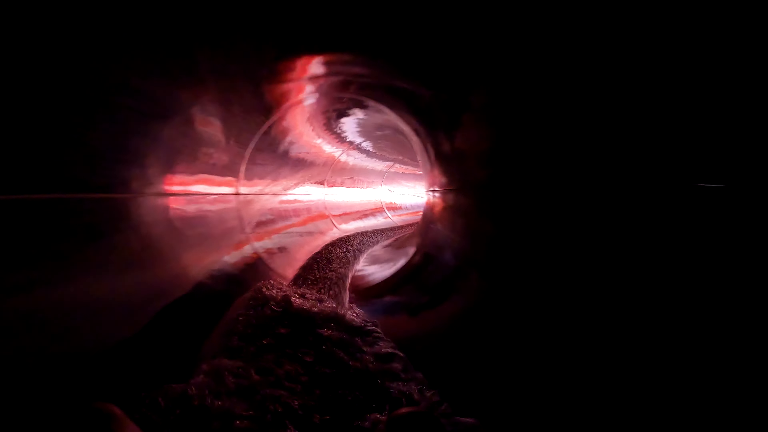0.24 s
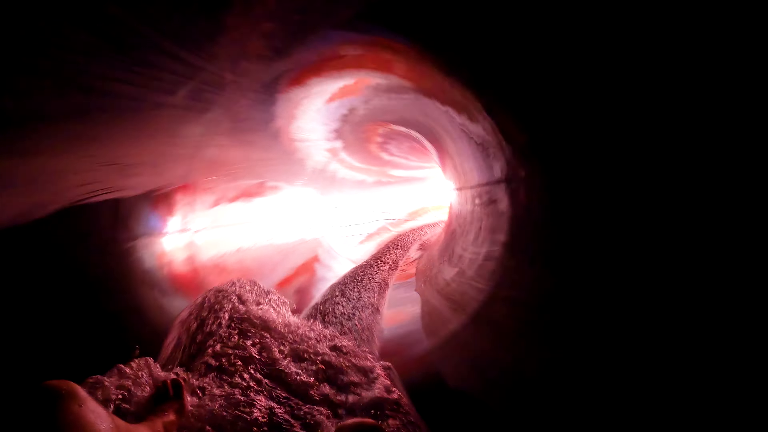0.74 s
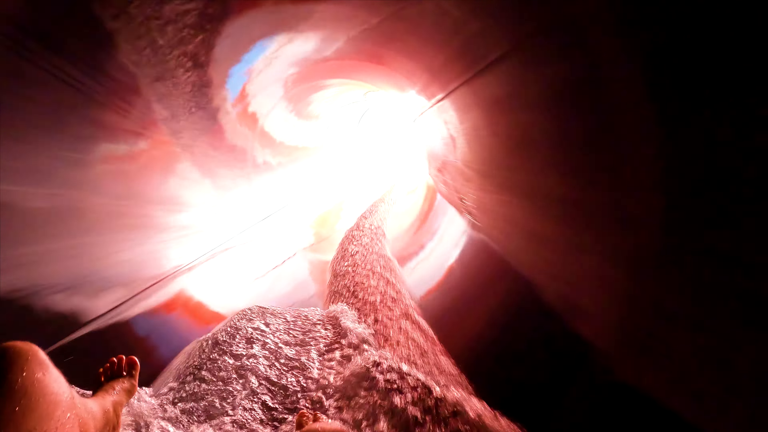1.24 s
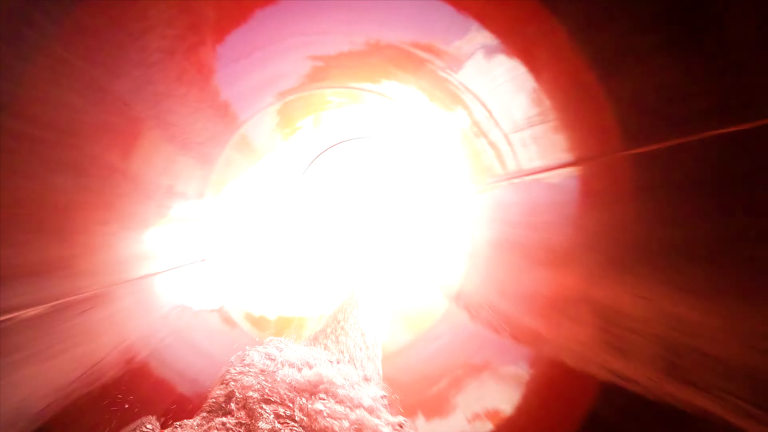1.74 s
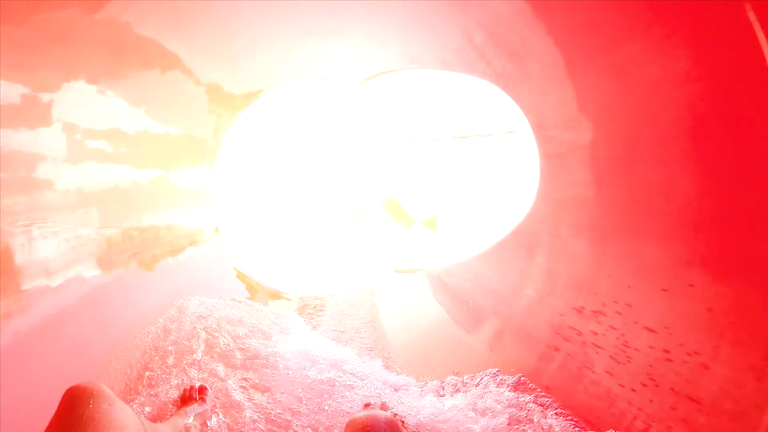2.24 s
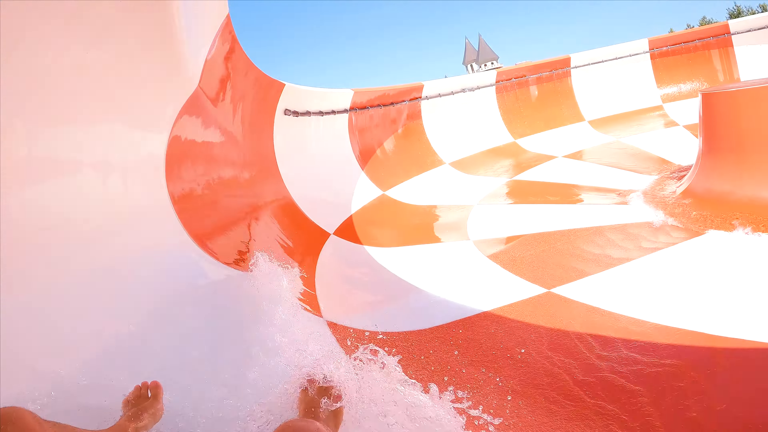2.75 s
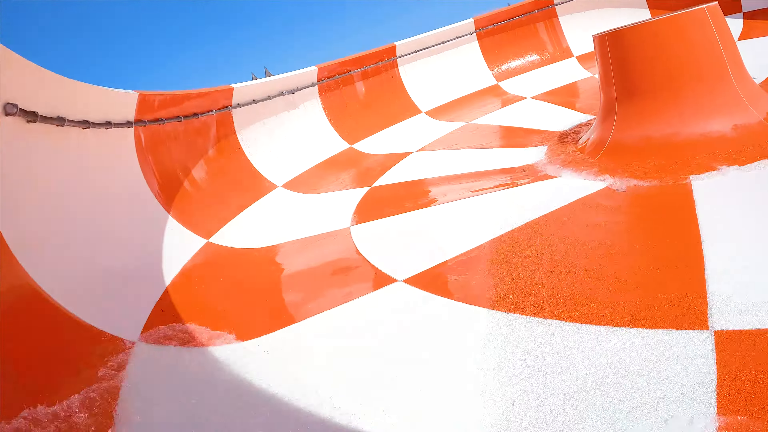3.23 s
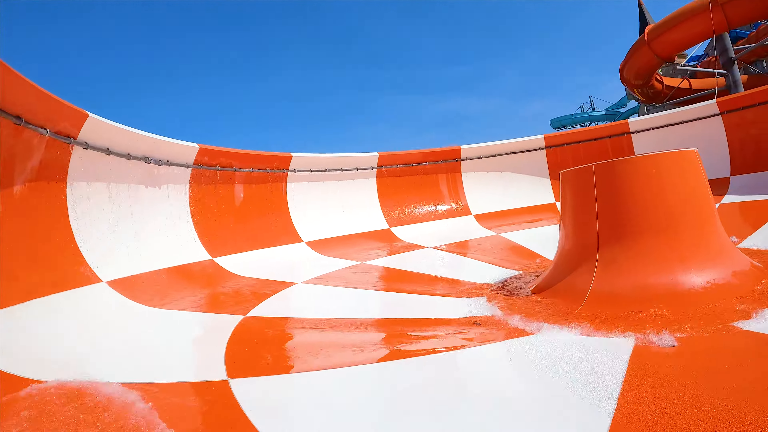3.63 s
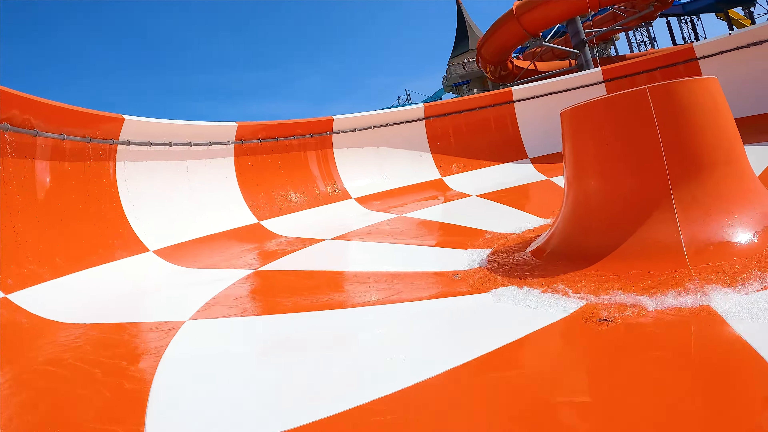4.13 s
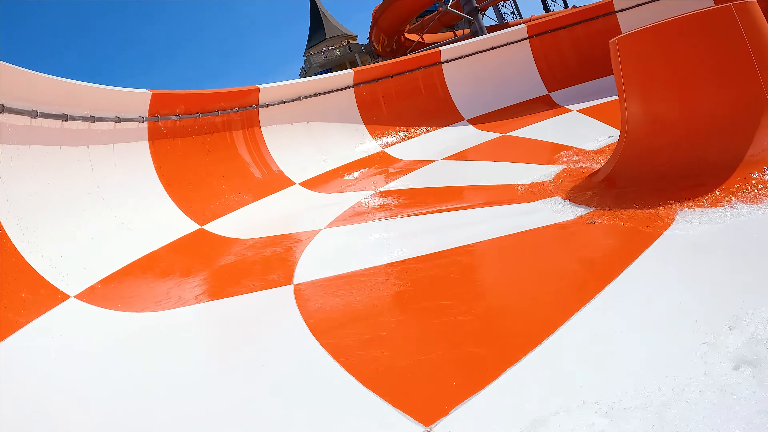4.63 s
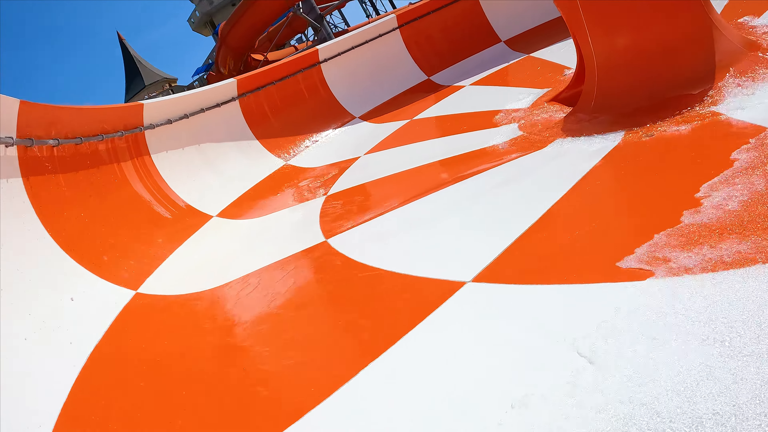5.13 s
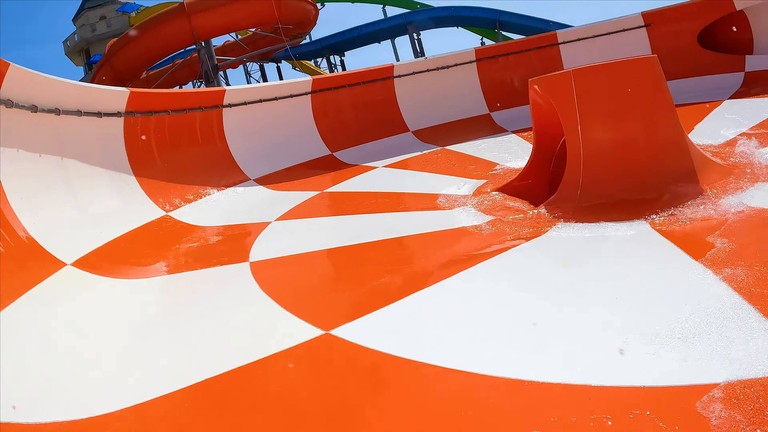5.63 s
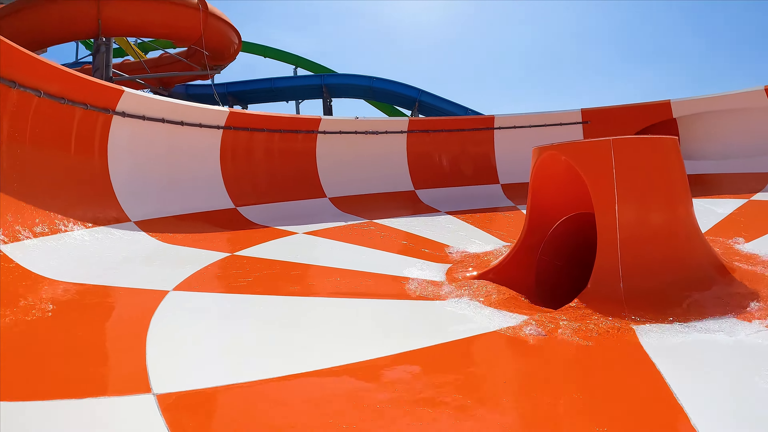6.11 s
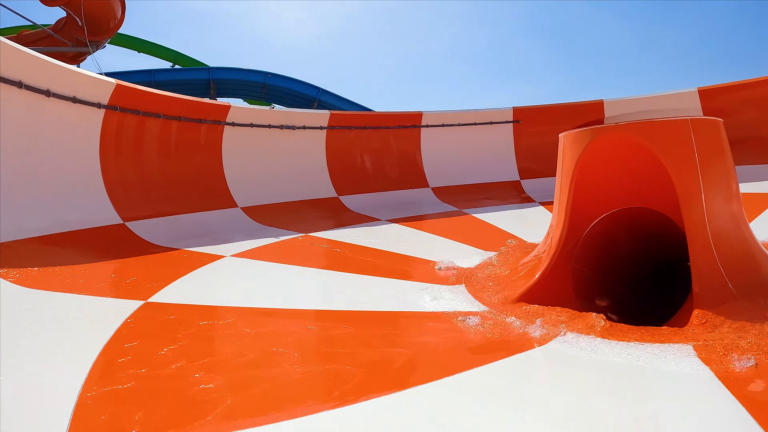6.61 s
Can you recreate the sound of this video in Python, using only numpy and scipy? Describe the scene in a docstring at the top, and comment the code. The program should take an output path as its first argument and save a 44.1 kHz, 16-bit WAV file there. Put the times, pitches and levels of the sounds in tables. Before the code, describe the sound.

Rushing water roars hollowly inside a humming slide tube over deep rumble, then opens into a bubbly bowl with slaps, gulps and a final splash.

```python
"""Water slide ride

A ride down a water slide, heard from a camera in a waterproof case on the rider.
Water roars (shaped noise) in a closed tube that hums in its resonances, then opens into a wide bowl.
Low noise rumbles throughout as air and hull buffet the case; waves, slaps and gulps of air break in.
In the bowl fine mist fizzes on the case, and at last a splash of impacts and bubbles breaks over it."""
import sys
import numpy as np
from scipy import signal
from scipy.fft import rfft, irfft, next_fast_len
from scipy.io import wavfile
from scipy.ndimage import uniform_filter1d, minimum_filter1d, map_coordinates

SR = 44100
rng = np.random.default_rng(int(sys.argv[2]) if len(sys.argv) > 2 else 0)


def transcribe(u):
    """Save the signal u as a 16-bit wav file named by the first command-line argument.

    u: samples, shape (n,) or (channels, n), limited to [-1, 1]; the rate is SR.
    q: integer samples, one column per channel.
    """
    v = np.clip(np.atleast_2d(u).T, -1, 1)
    q = np.round(v * 32767).astype(np.int16)
    wavfile.write(sys.argv[1], SR, q)


N = 302967

# waves that the rider ploughs through:
# (crest [s], rise [s], fall [s], spray level [dB], churn level [dB])
WAVES = [(1.51, 0.039, 0.043, -48.5, -41), (1.9, 0.13, 0.12, -51, -45), (2.66, 0.14, .08, -53.5, -29),
         (3.3, 0.089, 0.062, -43, -33), (3.41, 0.076, 0.041, -40, -29), (3.61, 0.061, 0.1, -48, -29),
         (4.47, 0.073, 0.19, -52.5, -32), (6.18, 0.31, 0.28, -50.5, -28.5)]
# surges in which the splash breaks over the case: (time [s], level [dB])
SURGES = [(6.583, -32.5), (6.76, -37)]
SURGE_ATTACK_S, SURGE_HOLD_S, SURGE_FADE_DB_PER_S = 0.028, 0.1, 85  # hold counts from the onset


def amp(db):
    """Decibels to gain."""
    return 10 ** (np.asarray(db) / 20)


def unit(x):
    """Scale to rms 1."""
    return x / np.sqrt(np.mean(x ** 2) + 1e-20)


def curves(rows):
    """One value per sample for each column after the time."""
    s, *cols = np.transpose(rows)
    return [np.interp(np.arange(N) / SR, s, c) for c in cols]


def wobble(rate):
    """A smooth random curve, rate knots a second."""
    knots = rng.standard_normal(int(N * rate / SR) + 4)
    return map_coordinates(knots, [np.arange(N) * rate / SR])


def filtered(x, response):
    """x times a response of frequency."""
    m = next_fast_len(N + 8192)
    return irfft(rfft(x, m) * response(np.fft.rfftfreq(m, 1 / SR)), m)[:N]


def coloured(x, spectrum):
    """x shaped by points of (frequency [Hz], level [dB]), at rms 1."""
    f, db = np.transpose(spectrum)
    return unit(filtered(x, lambda hz: amp(np.interp(np.log(hz + 1), np.log(f), db))))


def steady(x, span):
    """Even out swells slower than span seconds, keeping the fast flutter."""
    width = max(int(span * SR), 8)
    power = uniform_filter1d(uniform_filter1d(x * x, width), width)
    return x / np.sqrt(np.abs(power) + 1e-6)


def swell(s, rise, fall):
    """A smooth bump of gain that peaks at 1 at time s."""
    t = np.arange(N) / SR - s
    return np.exp(-.5 * (t / np.where(t < 0, rise, fall)) ** 2)


def together(gains):
    """Gain of unrelated sounds heard at once: their powers add."""
    return np.sqrt(sum(g ** 2 for g in gains))


def add(track, s, sound):
    """Mix a sound into a track at time s."""
    start = round(s * SR)
    track[start:start + len(sound)] += sound[:max(len(track) - start, 0)]


def turbulence(patchy_db):
    """White noise with patches of random gain in time and frequency."""
    z = signal.stft(rng.standard_normal(N), nperseg=1024)[2]
    field = uniform_filter1d(uniform_filter1d(rng.standard_normal(z.shape), 6, 0), 5, 1)
    return unit(signal.istft(z * amp(patchy_db * unit(field)), nperseg=1024)[1][:N])


def patter(rate, spread_db):
    """Random impacts of uneven size, rate a second, at rms 1."""
    at, size, sign = rng.random((int(rate * N / SR), 3)).T
    push = np.sign(sign - .5) * amp(-spread_db * np.log(np.maximum(size, .01)))
    return unit(np.bincount((at * N).astype(int), push, N))


def bubbles(rate, centre_hz, spread, cycles, size_db):
    """Air pockets ring down by 60 dB in so many cycles, rising in pitch as they near the surface."""
    at, pitch, size = rng.random((int(rate * N / SR), 3)).T[:, :, None]
    hz = centre_hz * np.exp(spread * (2 * pitch - 1))
    k = np.arange(SR // 30)
    turns = hz * k / SR
    age = turns / cycles
    envelope = amp(-size_db * np.log(np.maximum(size, .02)) - 60 * age) * (1 - np.exp(-2 * turns))
    rings = envelope * np.sin(2 * np.pi * turns * (1 + 0.048 * age))
    return unit(np.bincount(((at * N).astype(int) + k).ravel(), rings.ravel(), N)[:N])


def wavering(hz, share, rate):
    """A ringing tone of rms 1 whose pitch wanders at random."""
    return np.sqrt(2) * np.sin(2 * np.pi * np.cumsum(hz * (1 + share * wobble(rate))) / SR)


def resonance(hz, width_hz):
    """Noise ringing in one mode of the air, passed twice through a resonance of this width, at rms 1."""
    mode = lambda f: 1j * f * width_hz / (hz ** 2 - f * f + 1j * f * width_hz)
    return unit(filtered(rng.standard_normal(N), lambda f: mode(f) ** 2))


def breaking():
    """Gain of the splash: each surge hits quickly, holds and drains away."""
    surges = []
    for s, db in SURGES:
        age = np.maximum(np.arange(N) / SR - s, 0)
        fade_db = SURGE_FADE_DB_PER_S * np.maximum(age - SURGE_HOLD_S, 0)
        surges.append(np.minimum(age / SURGE_ATTACK_S, 1) * amp(db - fade_db))
    return together(surges)


def rumble():
    """Air buffets the case in gusts while the rider skims over the hull: low noise of uneven level."""
    # buffeting of air and hull: (time [s], level [dB])
    buffet = [(0.0, -18), (0.55, -19.5), (0.85, -20.5), (1.2, -18), (2.0, -19.5), (2.13, -22.5),
              (2.24, -16), (2.48, -20.5), (2.56, -22), (2.64, -19.5), (3.22, -19.5), (3.36, -20.5),
              (4.2, -21.5), (4.38, -18.5), (4.95, -19), (5.15, -26.5), (5.45, -22.5), (5.7, -20),
              (5.88, -24.5), (6.0, -20.5), (6.27, -19), (6.87, -21.5)]
    # its spectrum: (frequency [Hz], relative level [dB])
    rumble_spectrum = [(8, -13), (22, 1), (55, -0.5), (80, -3), (105, -3.5), (140, -12.5), (220, -39),
                       (500, -62.5), (1500, -120)]
    gust_db, gusts_per_s = 1.0, 15
    level_db = curves(buffet)[0] + gust_db * wobble(gusts_per_s)
    return amp(level_db) * steady(coloured(rng.standard_normal(N), rumble_spectrum), span=0.15)


def tube_ring(enclosed):
    """The rush keeps the cross mode of the tube humming roughly; higher resonances bloom and fade."""
    # swells of the hum: (peak [s], level [dB], rise and fall [s])
    hum_swells = [(.06, -28, 0.067), (.87, -25, 0.034), (1.07, -31, .05), (1.54, -25, 0.053),
                  (2.12, -28.5, 0.035)]
    # higher resonances that bloom as the rider passes:
    # (peak [s], level [dB], pitch [Hz], rise and fall [s])
    bloom_rows = [(.5, -27, 675, 0.054), (.67, -27, 877, 0.029), (1.69, -22, 637, 0.021),
                  (2.4, -26.5, 614, 0.1), (2.609, -25, 854, 0.043), (2.71, -25.5, 630, .03),
                  (2.8, -26, 760, 0.045)]
    hum_hz, hum_waver, hum_width_hz = 296, 0.022, 28  # waver as a share of the pitch
    hum_db = -32  # between swells, if fully enclosed
    bloom_width_hz = 90

    tone = wavering(hum_hz, hum_waver, rate=40)
    hum = steady(tone + .9 * resonance(hum_hz, hum_width_hz), span=.06)
    swells = [amp(db) * swell(s, length, length) for s, db, length in hum_swells]
    hum_gain = together([amp(hum_db) * enclosed ** 1.3, *swells])

    blooms = np.zeros(N)
    for s, db, hz, length in bloom_rows:
        ringing = steady(resonance(hz, bloom_width_hz), span=0.05)
        blooms += amp(db) * swell(s, length, length) * ringing
    return hum_gain * hum + blooms


def film(enclosed):
    """A thin film of water hisses on the wall while the tube surrounds the rider."""
    # spectrum of the film: (frequency [Hz], relative level [dB])
    film_spectrum = [(1500, -11), (2600, -2), (3300, 5), (4300, -8), (5500, -10.5), (6500, -19),
                     (7500, -24), (9000, -40.5), (12000, -58.5)]
    film_db = -61  # in the closed tube
    inside = np.clip(2 * enclosed - 1, 0, 1)
    gain = amp(film_db + 0.6 * wobble(4.2)) * np.sqrt(np.minimum(2 * inside, 1))
    return gain * coloured(turbulence(patchy_db=0.8), film_spectrum)


def mist():
    """Clouds of fine droplets fizz high on the case, until the splash washes them off."""
    # clouds that land on the case: (peak [s], rise [s], fall [s], level [dB])
    clouds = [(4.539, .2, 0.3, -75), (5.55, 0.34, 0.33, -75), (6.27, .27, 0.43, -67),
              (6.48, 0.083, 0.059, -70.5)]
    # spectrum of the fizz: (frequency [Hz], relative level [dB])
    fizz_spectrum = [(10500, -50.5), (11500, -19), (12100, -0.5), (12750, 0.5), (13500, -3), (14400, -10.5),
                     (15700, -13)]
    droplets = rng.standard_normal(N) + amp(-5.0) * patter(rate=900, spread_db=4.5)
    fizz = coloured(droplets, fizz_spectrum)
    exposed = (1 - np.tanh((np.arange(N) / SR - SURGES[0][0]) / SURGE_ATTACK_S + 1)) / 2
    return together([amp(db) * swell(s, rise, fall) for s, rise, fall, db in clouds]) * exposed * fizz


def spray(extra_flow_db):
    """Thrown water hisses dully through the case, more with the flow; waves throw up fine sheets of it."""
    # spectra of the steady hiss and of a wave's sheet: (frequency [Hz], relative level [dB])
    hiss_spectrum = [(700, -16.5), (1300, 3), (1700, 5), (2400, 2.5), (3100, 0.5), (3800, -6.5),
                     (5000, -15.5), (6000, -22), (7200, -29), (8500, -43.5), (11000, -55.5), (16000, -56)]
    sheet_spectrum = [(700, -12), (1300, 6), (1800, 9.5), (2400, 4.5), (3100, 1.5), (3800, -6), (5000, -16),
                      (6000, -25), (7200, -30.5), (8500, -43.5), (16000, -56.5)]
    spray_db, spray_growth = -52.5, 0.53  # level at the usual flow; dB gained per dB of flow
    hiss = coloured(turbulence(patchy_db=2.0) + amp(-5.0) * patter(rate=800, spread_db=2.5), hiss_spectrum)
    grains = rng.standard_normal(N) + amp(-5.5) * patter(rate=1800, spread_db=2)
    sheet = coloured(grains, sheet_spectrum)
    waves = together([amp(db) * swell(s, rise, fall) for s, rise, fall, db, _ in WAVES])
    return amp(spray_db + spray_growth * extra_flow_db + 0.8 * wobble(33)) * hiss + waves * sheet


def drops_and_clicks():
    """Single drops plip against the case, and two faint dry clicks sound at 6.584 and 6.6 s: brief sines."""
    # drops, and the two clicks at 7500 Hz:
    # (time [s], peak level before a 3.5 dB cut [dB], pitch [Hz], time to the peak [cycles])
    plip_rows = [(2.548, -42, 4980, 0.99), (5.088, -39, 2910, 6.2), (5.457, -45, 13100, 3),
                 (5.598, -49, 5200, 4.5), (5.642, -41, 4650, 2), (6.487, -42, 13200, 7.2),
                 (6.584, -47, 7500, 1), (6.593, -19, 1716, 3.3), (6.6, -46, 7500, 1),
                 (6.606, -21.5, 2190, 3.7), (6.626, -40, 4800, 0.56), (6.633, -25, 1900, 3),
                 (6.651, -18, 2030, 1.6), (6.67, -21, 2400, 1.5), (6.689, -24, 2500, 1.6),
                 (6.77, -17.5, 1590, 2.5), (6.789, -17, 1288, 4.5), (6.802, -25, 2150, 2.8),
                 (6.838, -21, 1870, 1.5)]
    out, t = np.zeros(N), np.arange(SR // 40) / SR
    for s, db, hz, cycles in plip_rows:
        u = hz * t / cycles
        add(out, s, amp(db - 3.5) * u ** 3 * np.exp(3 - 3 * u) * np.sin(2 * np.pi * hz * t))
    return out


def slaps():
    """Water slaps under the rider: each a short swell of narrow noise."""
    # slaps: (time [s], level before a 3.5 dB cut [dB], pitch [Hz], length, twice the rise [s])
    slap_rows = [(2.191, -16.5, 254, 0.035), (3.428, -18.5, 191, 0.036), (3.559, -19, 410, 0.03),
                 (3.62, -23, 1010, 0.014), (3.83, -19, 910, 0.021), (3.87, -17, 756, 0.015),
                 (4.017, -23.5, 800, 0.024), (4.122, -17, 265, 0.032), (4.123, -21, 560, 0.02),
                 (4.374, -18.5, 470, 0.03), (4.76, -20.5, 696, 0.017), (5.338, -26, 335, 0.033),
                 (5.371, -24.5, 970, 0.018), (5.663, -20.5, 540, 0.037), (5.753, -18.5, 397, 0.021),
                 (5.982, -33, 702, 0.01), (6.313, -18, 669, 0.02), (6.576, -15.5, 231, 0.036)]
    out, t = np.zeros(N), np.arange(SR // 4) / SR
    for s, db, hz, length in slap_rows:
        band = [(hz / 3, -60), (hz * .75, 0), (hz * 1.25, 0), (hz * 2, -28), (hz * 5, -90)]
        body = steady(coloured(rng.standard_normal(N), band)[:len(t)], span=0.004)
        u = 2 * t / length
        add(out, s, amp(db - 3.5) * body * u * u * np.exp(2 - 2 * u))
    return out


def gulps():
    """A big pocket of air swells, throbs for a few cycles with rising pitch and is gone."""
    # pockets gulped under the rider:
    # (loudest [s], peak level [dB], pitch [Hz], length as spread of the swell [cycles])
    gulp_rows = [(.61, -17.5, 131, 1.2), (2.632, -17, 129, 1.9), (3.441, -14.5, 172, 0.99),
                 (3.473, -17, 155, 1.2), (3.492, -20, 247, 1.9), (3.532, -18.5, 159, 1.4),
                 (3.803, -15.5, 164, 1.7), (3.891, -12.5, 333, 0.58), (4.161, -9, 169, 0.9),
                 (4.396, -19.5, 221, 2.9), (4.68, -14.5, 128, 1.7), (4.801, -21.5, 345.6, 2.5),
                 (5.674, -16, 193, 1.7), (6.327, -16, 384, 2), (6.63, -14.5, 189, 1.07),
                 (6.696, -14.5, 301, 2.1), (6.729, -15, 206, 1.8), (6.735, -15.5, 450, 1.9),
                 (6.797, -14, 139, 1.4)]
    gulp_rise = .04  # share by which the pitch climbs each cycle
    out, t = np.zeros(N), np.arange(-SR // 20, SR // 20) / SR
    for s, db, hz, cycles in gulp_rows:
        turns = hz * t
        throb = np.sin(2 * np.pi * (turns * (1 + gulp_rise * turns / 2) + rng.random()))
        add(out, s + t[0], amp(db) * np.exp(-.5 * (turns / cycles) ** 2) * throb)
    return out


def smacks():
    """A slug of water smacks the case flat: one sharp push and rebound, without ringing."""
    # slugs: (time [s], peak level [dB], centre frequency [Hz])
    smack_rows = [(6.609, -27, 1700), (6.672, -27, 1850), (6.692, -32, 2350), (6.728, -30, 1800),
                  (6.803, -27, 1800)]
    out, t = np.zeros(N), np.arange(-SR // 200, SR // 200) / SR
    for s, db, hz in smack_rows:
        u = (np.pi * hz * t) ** 2
        add(out, s + t[0], amp(db) * (1 - 2 * u) * np.exp(-u))
    return out


def glugs():
    """Cavities in the splash ring with an unsteady pitch that glides as they open or close."""
    # cavities: (time [s], length [s], level [dB], start pitch [Hz], end pitch [Hz])
    cavities = [(6.639, .018, -26, 453, 1270), (6.642, .036, -31, 1147, 882),
                (6.647, 0.055, -40.5, 2120, 1762), (6.699, 0.044, -38, 1753, 1463),
                (6.73, .04, -30, 693, 602), (6.799, .06, -31, 1170, 964)]
    glug_waver = 0.033  # share of the pitch
    out, t = np.zeros(N), np.arange(N) / SR
    for s, length, db, start_hz, end_hz in cavities:
        u = np.clip((t - s) / length, 0, 1)
        tone = wavering(start_hz + (end_hz - start_hz) * u, glug_waver, rate=210)
        out += amp(db) * np.sqrt(4 * u * (1 - u)) * tone
    return out


def splash():
    """A wave breaks over the case: a dense, muffled wash full of small bubbles that ring and burst."""
    # spectra of the impacts on the case and of bursting bubbles: (frequency [Hz], relative level [dB])
    case_spectrum = [(100, -10), (400, -4), (1100, 15), (1600, 17), (2000, 1.5), (2500, -19), (3500, -27),
                     (6000, -51), (12000, -58.5)]
    crackle_spectrum = [(800, -11), (1700, 4), (2400, -1.5), (3200, -14.5), (4500, -36), (6000, -48),
                        (9000, -56), (15000, -77)]
    impacts = coloured(patter(rate=6000, spread_db=1), case_spectrum)
    ringing = bubbles(rate=420, centre_hz=1450, spread=0.4, cycles=12, size_db=3)
    froth = filtered(ringing, lambda hz: 1 / (1 + (hz / 2700) ** 8))
    crackle = coloured(patter(rate=230, spread_db=2), crackle_spectrum)
    return breaking() * (steady(impacts + amp(-8.5) * froth, span=.03) + amp(-13) * crackle)


def churn(extra_flow_db, enclosed):
    """Water is ploughed aside in lumps with pockets of air, most in the bowl, waves and splash."""
    # spectrum of the wash: (frequency [Hz], relative level [dB])
    churn_spectrum = [(70, -27.5), (120, 0), (160, 1), (240, -1.5), (340, -3.5), (430, -11), (600, -22.5),
                      (1500, -61), (4000, -120)]
    churn_db, churn_growth = -25, 0.44  # level at the usual flow; dB gained per dB of flow
    smooth_tube_db = 6.5  # the tube's even sheet of water churns this much less
    lump_db, lumps_per_s = 1.5, 14
    surge_churn_db = 13  # the churn that a surge stirs up, over the surge itself

    pockets = bubbles(rate=150, centre_hz=254.0, spread=.6, cycles=7.3, size_db=6.0)
    wash = coloured(turbulence(patchy_db=1), churn_spectrum)
    running_db = churn_db + churn_growth * extra_flow_db - smooth_tube_db * enclosed
    running = amp(running_db + lump_db * wobble(lumps_per_s))
    waves = [amp(db) * swell(s, rise, fall) for s, rise, fall, _, db in WAVES]
    gain = together([running, amp(surge_churn_db) * breaking(), *waves])
    return gain * steady(unit(wash + amp(-9.0) * pockets), span=0.32)


def rush(level_db, enclosed):
    """Running water: hollow in the tube, fuller and lower at its mouth, broad and bubbly in the bowl."""
    # spectra along the way: (frequency [Hz], relative level [dB])
    tube_spectrum = [(250, -45), (380, -22.5), (430, -16), (485, -11.5), (570, 1.5), (680, -3), (770, -3),
                     (860, -4.5), (1000, -8.5), (1250, -18), (1600, -24), (2100, -32), (3000, -47.5),
                     (6000, -100)]
    mouth_spectrum = [(240, -24.5), (350, -12.5), (415, -3), (480, -2.5), (570, -1.5), (850, -5),
                      (960, -6.5), (1080, -11), (1300, -17), (1600, -23.5), (2100, -33.5), (3000, -44),
                      (6000, -100)]
    bowl_spectrum = [(250, -28), (400, -6), (560, -1.5), (720, -2.5), (850, -1.5), (1050, -7.5),
                     (1250, -12.5), (1600, -19.5), (2100, -29.5), (3000, -52.5), (6000, -100)]
    tube = coloured(turbulence(patchy_db=1.5), tube_spectrum)
    mouth = coloured(turbulence(patchy_db=0.5), mouth_spectrum)
    gurgle = bubbles(rate=350, centre_hz=790, spread=.4, cycles=22, size_db=2)
    bowl = unit(coloured(turbulence(patchy_db=2), bowl_spectrum) + amp(-9.0) * gurgle)
    bowl = bowl * amp(0.8 * wobble(45))

    # crossfade by power: the mouth lies halfway between tube and bowl
    inside, outside = np.maximum(2 * enclosed - 1, 0), np.maximum(1 - 2 * enclosed, 0)
    flow = np.sqrt(inside) * tube + np.sqrt(1 - inside - outside) * mouth + np.sqrt(outside) * bowl
    return amp(level_db + 0.5) * steady(flow, span=0.098)


def scene():
    """Tube, then bowl: the flow drives rush, churn and spray, with the hits and the last splash on top."""
    # how far the tube encloses the rider: (time [s], share [0-1])
    enclosure = [(0, 0.88), (.55, 0.78), (.95, 1), (1.6, 0.61), (2.0, 0.67), (2.5, 0.69), (3.1, 0.45),
                 (3.6, 0.13)]
    # strength of the running water, the one control of rush, churn and spray: (time [s], level [dB])
    flow_curve = [(0.0, -23), (0.55, -24), (1.25, -27), (1.72, -25), (2.0, -24), (2.35, -23), (2.78, -22.5),
                  (3.0, -23.5), (3.42, -22.5), (3.72, -27.5), (4.3, -28.5), (4.45, -26.0), (4.85, -26),
                  (5.2, -31.5), (5.4, -29.5), (5.85, -30), (6.6, -27.5), (6.87, -28.5)]
    usual_flow_db = -26
    enclosed = np.clip(curves(enclosure)[0], 0, 1)
    flow_db = curves(flow_curve)[0]
    extra_flow_db = flow_db - usual_flow_db
    background = rumble() + tube_ring(enclosed) + film(enclosed) + mist()
    hits = drops_and_clicks() + slaps() + gulps() + smacks() + glugs() + splash()
    water = spray(extra_flow_db) + churn(extra_flow_db, enclosed) + rush(flow_db, enclosed)
    return (background + hits + water)[None]


def record(dry):
    """The camera's limiter holds the peaks down, and its band ends steeply."""
    ceiling, top_hz = .48, 15720
    needed = np.minimum(1, ceiling / (np.abs(dry[0]) + 1e-9))
    gain = uniform_filter1d(minimum_filter1d(needed, size=600), size=500)  # sizes in samples
    return filtered(dry[0] * gain, lambda hz: hz < top_hz)[None]


dry = scene()
out = record(dry)
transcribe(out)
```